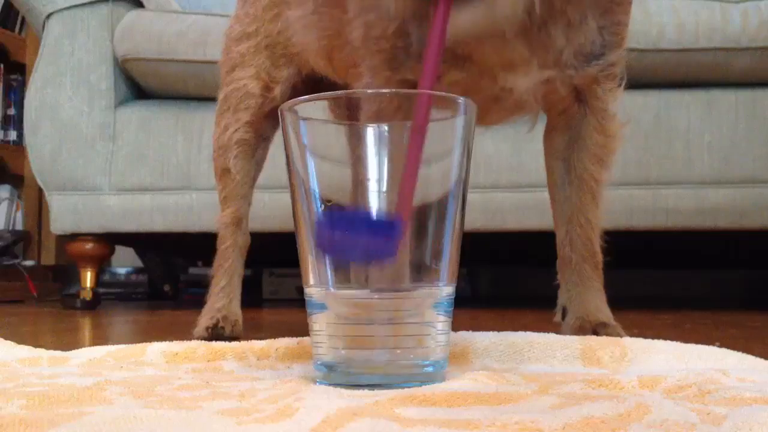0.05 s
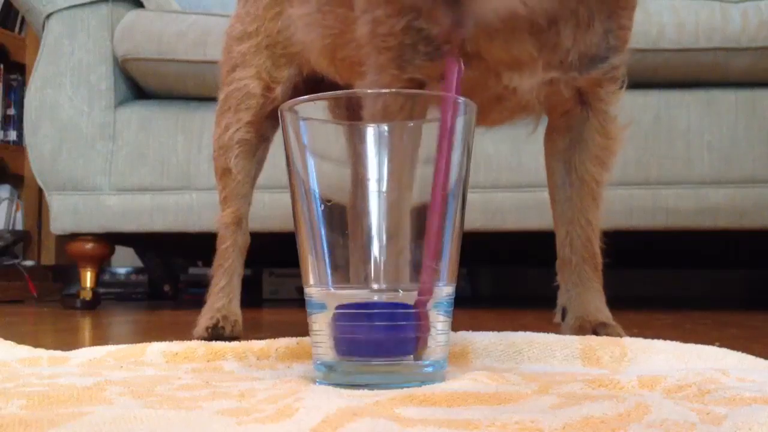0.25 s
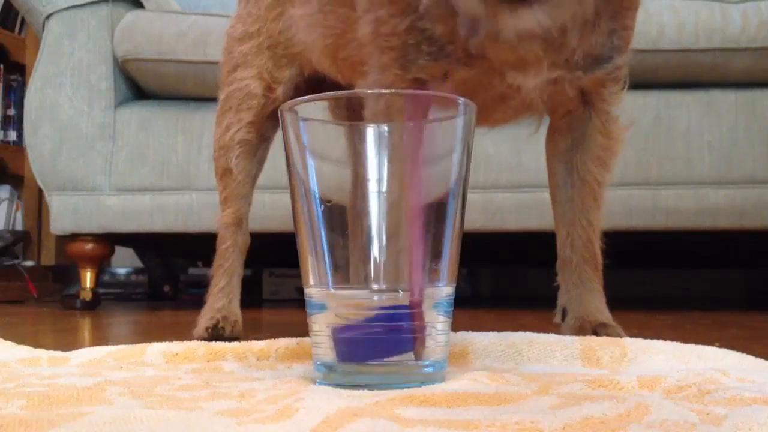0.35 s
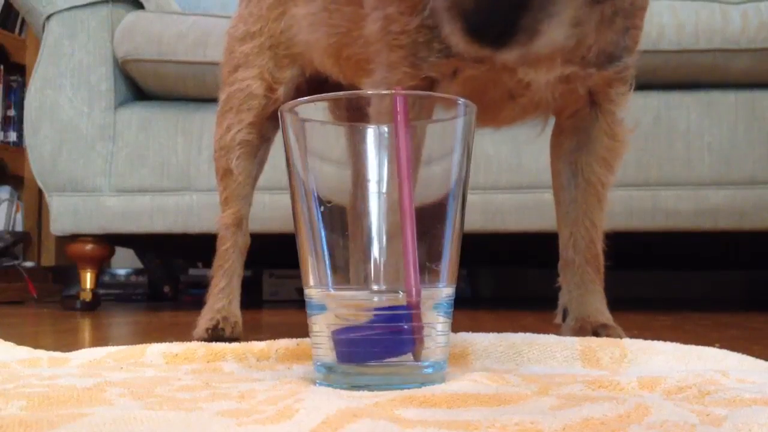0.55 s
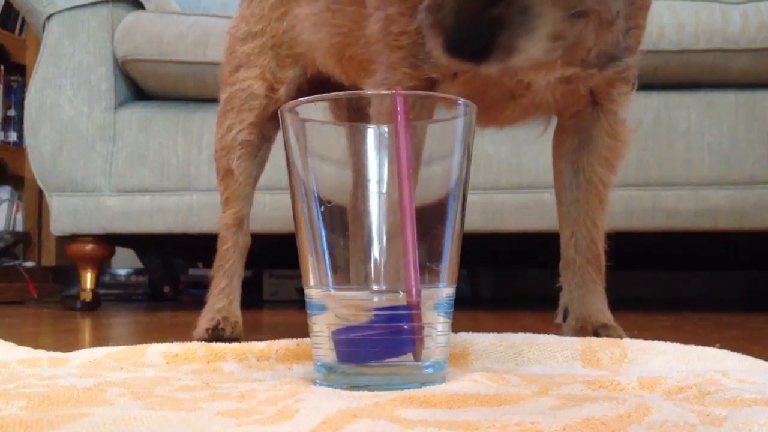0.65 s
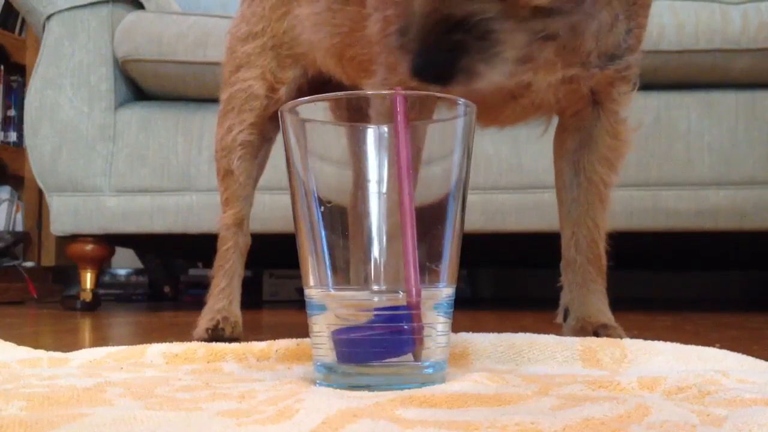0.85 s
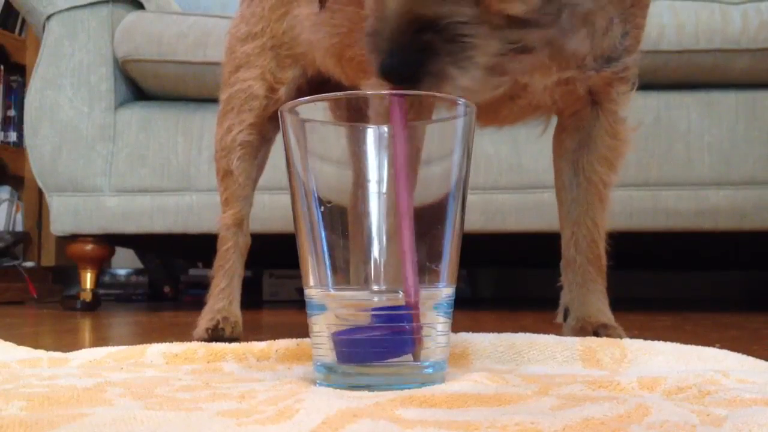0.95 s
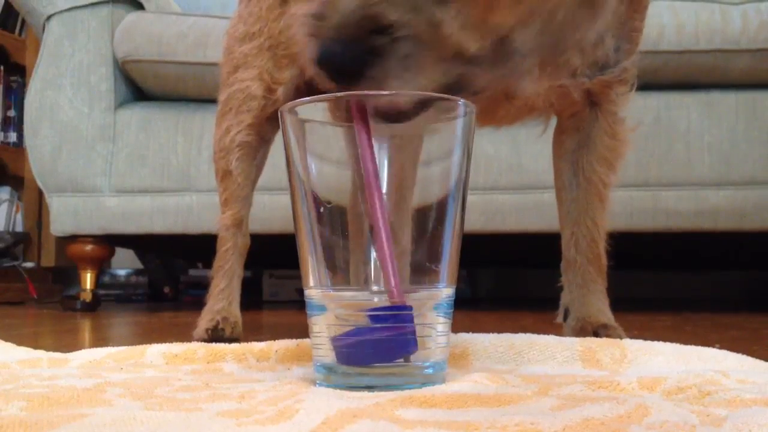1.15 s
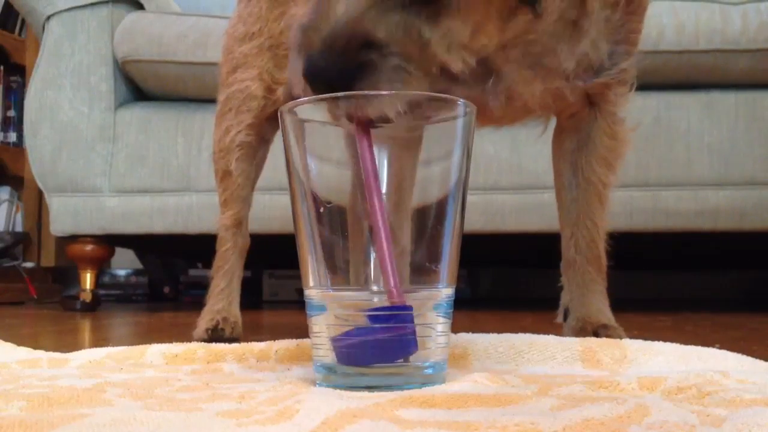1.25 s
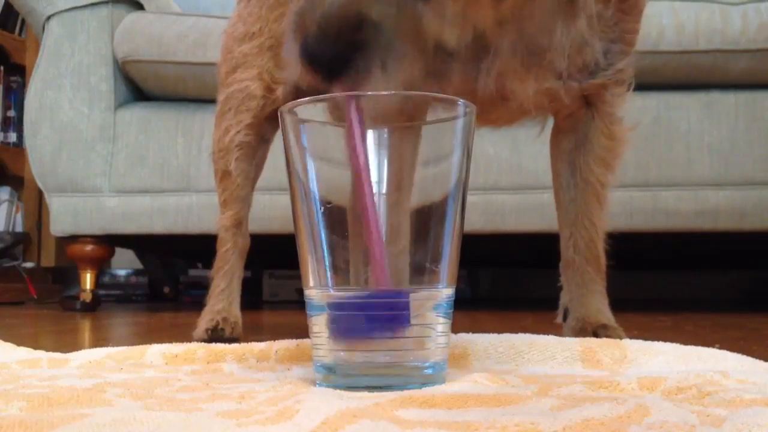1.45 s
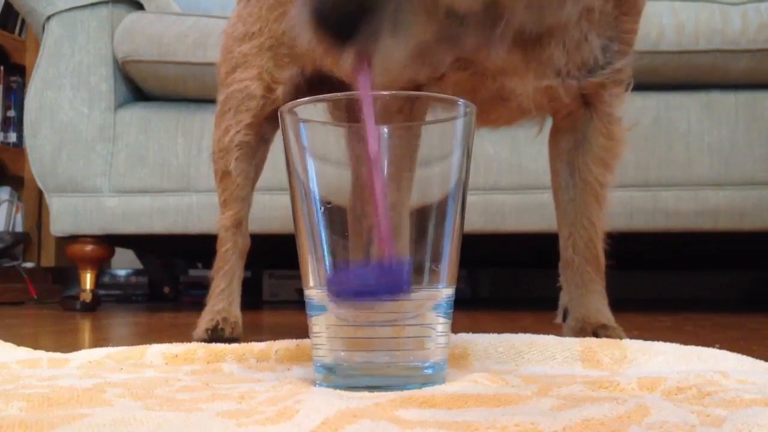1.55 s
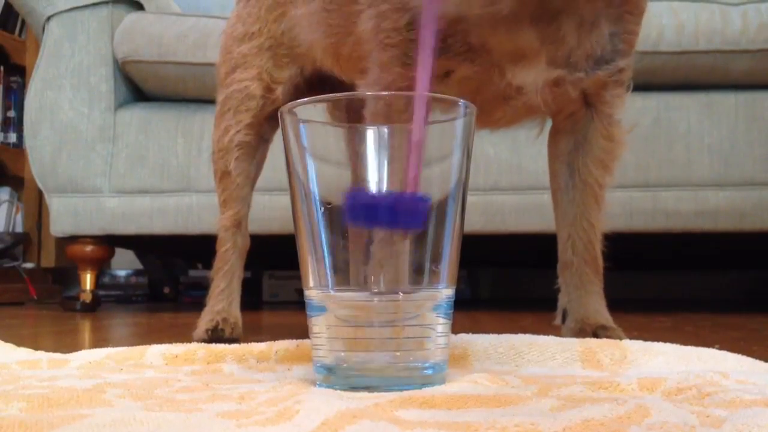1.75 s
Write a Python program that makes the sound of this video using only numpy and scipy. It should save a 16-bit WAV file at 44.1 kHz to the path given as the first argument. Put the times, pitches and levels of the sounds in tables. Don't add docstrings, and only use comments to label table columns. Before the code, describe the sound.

A drinking glass is struck by a plastic scoop, heard close up. Faint scraping opens, then two loud bright clinks at 0.2 and 0.3 seconds, with hollow knocks, rattling and a soft towel thump, settling by 0.5. The ringing dies quickly into quiet hiss. A softer clink comes at 1.1, then light plastic scrapes, ticks and small squeaks from 1.3 to 1.8 in a small furnished room.

```python
import sys
import numpy as np
from scipy import signal
from scipy.fft import rfft, irfft
from scipy.io import wavfile
from scipy.ndimage import uniform_filter1d

SR = 44100
rng = np.random.default_rng(int(sys.argv[2]) if len(sys.argv) > 2 else 0)


def unload_audio(sound):
    columns = np.transpose(np.atleast_2d(sound))
    steps = np.round(np.clip(columns, -1, 1) * 32767)
    wavfile.write(sys.argv[1], SR, steps.astype(np.int16))


def convert_level_to_amplitude(level_db):
    exponent = np.asarray(level_db, float) / 20
    return 10 ** exponent


N = 79380

WALL_HZ = [1965, 4105, 6789, 7349, 8982, 10168, 12460, 13580, 14105, 14770, 4568, 3975]


def seconds():
    return np.arange(N) / SR


def band(x, hz, width):
    return signal.lfilter(*signal.iirpeak(hz, hz / width, fs=SR), x)


def passband(x, low_hz, high_hz):
    return signal.sosfilt(signal.butter(3, [low_hz, high_hz], "band", fs=SR, output="sos"), x)


def unit(x):
    return x / np.sqrt(np.mean(x ** 2))


def resonate(x, hz, width):
    return band(band(x, hz, width), hz, width * SECOND_WIDTH[0])


def add(out, start, x):
    i = int(start * SR)
    out[i:i + len(x)] += x[:N - i]


def ring(start, hz, t60, clock, rise):
    out = np.zeros(N)
    first = int(start * SR)
    last = np.searchsorted(clock, clock[first] + 2 * t60)
    t = np.arange(first, last) / SR - start
    fade = convert_level_to_amplitude(-60 * (clock[first:last] - clock[first]) / t60)
    out[first:last] = np.clip(t / rise, 0, 1) * fade * np.sin(2 * np.pi * hz * t)
    return out


def burst(tau):
    click = 0.22 * np.exp(-np.arange(2048) / SR / tau) * rng.standard_normal(2048)
    click[0] = 2
    return click


def walk(rate):
    hold = int(SR / rate)
    steps = np.repeat(rng.standard_normal(N // hold + 1), hold)
    return unit(uniform_filter1d(steps, hold)[:N])


def grit():
    hits = rng.random(N) < 2500 / SR
    grains = hits * convert_level_to_amplitude(1.26 * rng.exponential(size=N)) * rng.standard_normal(N)
    return unit(grains) + 0.24 * rng.standard_normal(N)


SECOND_WIDTH = (2,)


def glass():
    # level/dB, t60/s, twin level/dB
    wall_tones = [(-11.5, 0.6, -30), (0, 0.23, -28.5), (-10, 0.15, -29), (-24, 0.24, -3.5),
                  (-20.5, 0.1, -9), (-23, 0.11, -8), (-29, 0.074, -17), (-37, .16, -13), (-21.5, .09, -15),
                  (-34, .1, -13.5), (-18.5, 0.02, -16.5), (-25.5, .06, -16.5)]
    twin_hz = [1976, 4111, 6797, 7316, 8956, 10148, 12475, 13600, 14125, 14745, 4690, 3921]
    # t/s, level/dB, lowest tone/dB, treble slope/dB per octave, twin level/dB
    knocks = [
        (.2011, -8.5, -10, -0.9, -8),
        (0.2672, -46.5, 8, 14.5, -1.5),
        (0.3152, -7.5, -1.5, 0.93, 2),
        (0.355, -38.5, -22, 13, -3.5),
        (1.1181, -24, 6.5, -2, -5),
    ]
    knock_spots = [0, 3, 1, 3, 2]
    # rim/dB, middle/dB, foot/dB, grazing touch/dB
    spots = [(0, 0.5, 1, 8), (-1, 0.5, -0.5, 0.5), (0, -1.5, 0.5, 6.5), (5, -11.5, 1.5, -7),
             (-4, 0.5, 0.5, 1.5), (-2, 0.5, -7.5, 0.5), (3.5, -2.5, 1.5, -8.5), (5, 1.5, -1, -4),
             (0.5, 1, -11, -8.5), (3, 1.5, -4, -12.5), (5, 4.5, -12, -3), (-0.5, -4.5, 2, -10)]
    # t/s, then factors for the lowest tone, the second (sinking fast near 0.6 s), the
    damping = np.array([(0, 4.4, 1.55, 1.8), (.27, 2.8, 0.98, 0.79), (.314, 1.4, 0.79, 1.3),
                        (.318, 0.65, 1.53, 1.49), (.35, 0.46, 0.9, 0.51), (.43, 0.69, 0.69, 0.91),
                        (0.521, 0.83, 0.82, 0.86), (0.559, 1.83, 2.5, 0.96), (.6, 1.07, 3, .95),
                        (.66, 0.83, 2.5, 1.04), (1.1, 1.48, 1.46, 0.95), (1.19, 0.6, 0.6, 0.9),
                        (1.22, 1.35, 0.49, 0.6), (1.36, 1.09, 1.54, 0.75), (1.4, 0.69, .9, .8),
                        (1.8, 0.7, .9, 0.85)]).T
    clocks = []
    for factor in damping[1:]:
        speed = np.clip(np.interp(seconds(), damping[0], factor), 0.2, 5)
        clocks.append(np.cumsum(speed) / SR)
    crack_db, crack_s, contact_s = -11.5, 0.0057, 0.00032
    out = np.zeros(N)
    for (start, db, low_db, slope, twin_db), spot in zip(knocks, knock_spots):
        add(out, start, convert_level_to_amplitude(db + crack_db) * passband(burst(crack_s), 1050, 6200))
        for k, (tone_db, t60, pair_db) in enumerate(wall_tones):
            tilt_db = low_db if k == 0 else slope * np.log2(WALL_HZ[k] / WALL_HZ[1])
            clock = clocks[min(k, 2)]
            main = ring(start, WALL_HZ[k], t60, clock, contact_s)
            twin = ring(start, twin_hz[k], t60, clock, contact_s)
            out += convert_level_to_amplitude(db + tone_db + spots[k][spot] + tilt_db) * (main + convert_level_to_amplitude(pair_db + twin_db) * twin)
    return out


def ticks():
    # t/s, level/dB, f/Hz, width/Hz
    taps = [(.001, -42, 2030, 1815), (.117, -44.5, 7400, 3500), (0.136, -46, 7900, 1980),
            (0.175, -54, 7930, 1960), (.222, -24.5, 2490, 1454), (0.24, -21.5, 2800, 1480),
            (.267, -17.5, 2600, 2500), (.268, -28.5, 5870, 250), (.269, -41, 9200, 700),
            (.203, -32.5, 1120, 450), (.214, -36, 1140, 400), (0.288, -27, 3180, 1510),
            (0.329, -35.5, 1240, 1190), (0.365, -24, 2920, 1524), (0.465, -34.5, 3420, 900),
            (.995, -43.5, 1500, 2200), (1.104, -49, 1500, 2000), (1.1143, -42, 2590, 900),
            (1.1173, -50, 5010, 3000), (1.284, -47.5, 6000, 5000), (1.299, -46.5, 3500, 1210),
            (1.298, -54, 6500, 4010), (1.118, -39.5, 8500, 2000), (1.423, -50, 2800, 1940),
            (1.383, -37, 5050, 5040), (1.4157, -39.5, 3400, 2500), (1.417, -44, 6840, 1210),
            (1.417, -49.5, 11600, 3990), (1.385, -53, 12000, 3500), (1.502, -31, 2600, 2190),
            (1.523, -30, 1880, 1670), (1.523, -39.5, 9000, 9000), (1.62, -43, 2950, 2010),
            (1.6396, -37.5, 1920, 900), (1.642, -38, 3350, 2020), (1.651, -35.5, 2584, 3020),
            (1.654, -49.5, 7600, 1500), (1.686, -41, 3300, 2430), (1.697, -51, 3200, 700),
            (1.708, -38, 3720, 1490), (1.731, -61, 4700, 1500)]
    fade_s, air_db = 0.0032, -37
    out = np.zeros(N)
    for start, db, hz, width in taps:
        click = burst(fade_s)
        body = passband(click, hz ** 2 / (hz + 0.82 * width), hz + 0.6 * width)
        add(out, start, convert_level_to_amplitude(db) * (body / np.abs(body).max() + convert_level_to_amplitude(air_db) * click))
    return out


def booms():
    # t/s, level/dB, f/Hz
    puffs = [(0.104, -48, 785), (0.116, -45, 785), (0.2, -33.5, 725), (0.221, -25.5, 805),
             (0.267, -15, 820.4), (0.289, -41, 830), (0.326, -27, 845), (0.369, -46.5, 752),
             (0.457, -41.5, 810), (0.497, -44, 857), (0.994, -52, 704), (1.117, -40, 776),
             (1.178, -46, 810), (1.298, -46.5, 782), (1.346, -48, 805), (1.376, -45.5, 710),
             (1.502, -49.5, 795), (1.522, -54, 831), (1.549, -47.5, 805), (1.655, -39.5, 805),
             (1.7, -48, 760), (1.777, -53, 790)]
    # f/Hz, level/dB, t60/s
    air_tones = [(805, -4.5, 0.063), (845, -23, 0.076), (740, -33, 0.058)]
    rise_s = 0.0025
    out = np.zeros(N)
    for start, db, pitch_hz in puffs:
        shift = pitch_hz / air_tones[0][0]
        for hz, tone_db, t60 in air_tones:
            out += convert_level_to_amplitude(db + tone_db) * ring(start, hz * shift, t60, seconds(), rise_s)
    return out


def chatter():
    # t/s, level/dB
    settling = [
        (.2, -90.5),
        (.202, -39),
        (.25, -47.5),
        (.3, -45.5),
        (.33, -42.5),
        (.37, -46.5),
        (.4, -56),
        (.48, -58.5),
        (.58, -82),
    ]
    level_db = np.interp(seconds(), *np.array(settling).T, right=-120)
    rub = grit() * convert_level_to_amplitude(level_db + 1.5 * walk(80))
    shiver_db, top_db, air_db, width = -1.5, -8, 9, 180
    shiver = np.zeros(N)
    for hz in [*WALL_HZ[2:10], 5900]:
        tone_db = top_db if hz > 11000 else 0
        shiver += convert_level_to_amplitude(tone_db) * band(band(rub, hz, width), hz, 3 * width)
    shiver *= np.sqrt(SR / width / 30)
    return 2.02 * passband(rub, 900, 4700) + convert_level_to_amplitude(shiver_db) * shiver + convert_level_to_amplitude(air_db) * band(rub, 820, 80)


def scrape():
    # t/s, level/dB, brightness/dB per octave
    strokes = np.array([(0, -47.5, -1), (0.052, -63, -2.5), (.15, -68.5, -4), (0.198, -77.5, -5.5),
                        (.9, -88.5, -4), (.99, -88.5, 4), (1.001, -69, -3.5), (1.1, -84, 0),
                        (1.25, -76.5, -6.5), (1.37, -64.5, 1.5), (1.39, -60, -1.5), (1.45, -61.5, 4),
                        (1.49, -63, 7), (1.529, -53, -6), (1.6, -58, -1), (1.66, -54.5, 1),
                        (1.718, -59, -1), (1.8, -65, 6)]).T
    # f/Hz, width/Hz, level/dB
    resonances = [(810, 63, -11.5), (1350, 670, -12.5), (1840, 320, -2.5), (2800, 510, -1.5),
                  (3500, 310, -9), (4770, 2300, -10), (7455, 530, -7)]
    rub = grit()
    push_db = np.interp(seconds(), strokes[0], strokes[1])
    slope = np.interp(seconds(), strokes[0], strokes[2])
    flicker_db, bed_db = 4.5, -8
    out = convert_level_to_amplitude(bed_db) * unit(passband(rub, 750, 8800))
    for hz, width, db in resonances:
        level_db = db - 8 + slope * np.log2(hz / 2500) + flicker_db * walk(18)
        out += convert_level_to_amplitude(level_db) * unit(resonate(rub, hz, width))
    return out * convert_level_to_amplitude(push_db)


def rubs():
    # t/s, half length/s, level/dB, f/Hz, width/Hz
    squeaks = [(.005, 0.018, -59.5, 7800, 150), (1.06, 0.025, -66, 1250, 230),
               (1.298, 0.0064, -65, 1440, 398), (1.392, 0.0067, -53.5, 3440, 350),
               (1.5, 0.013, -64, 6800, 180), (1.541, 0.023, -55, 2470, 360), (1.72, 0.026, -58, 785, 49),
               (1.57, 0.021, -59.5, 813, 70), (1.628, 0.016, -65, 760, 92), (.4, .05, -57.5, 840, 31),
               (0.63, 0.021, -67, 4150, 21), (0.018, .03, -60, 1500, 660), (.05, 0.054, -65, 3000, 400),
               (1.545, 0.029, -58, 1800, 400), (1.667, 0.044, -59, 1830, 350),
               (1.45, .03, -64.5, 3120, 750), (1.62, 0.063, -63, 4640, 630),
               (1.70, 0.031, -59.5, 3340, 330), (1.744, 0.025, -58.5, 4760, 490),
               (1.789, 0.025, -59.5, 3470, 536)]
    t, rub, out = seconds(), grit(), np.zeros(N)
    for middle, half_s, db, hz, width in squeaks:
        swell = np.exp(-0.5 * ((t - middle) / half_s) ** 2)
        out += convert_level_to_amplitude(db) * swell * unit(resonate(rub, hz, width))
    return out


def thumps():
    # t/s, level/dB, f/Hz, half length/s
    pushes = [
        (.324, -44, 264, 0.0021),
        (.332, -33, 188, 0.0042),
        (.333, -46.5, 428, 0.0041),
        (0.348, -48.5, 215.6, 0.0048),
        (0.503, -45.5, 202, 0.0034),
        (1.108, -48, 248, 0.0018),
        (1.129, -54.5, 163.4, 0.0045),
    ]
    t, out = seconds(), np.zeros(N)
    for middle, db, hz, half_s in pushes:
        swell = np.exp(-0.5 * ((t - middle) / half_s) ** 2)
        out += convert_level_to_amplitude(db) * swell * np.sin(2 * np.pi * hz * (t - middle))
    return out


def room_echo(x):
    t60_s, lag_s, top_hz, echo_db = 0.46, 0.0032, 6180, -8.5
    t = np.arange(SR // 2) / SR
    tail = rng.standard_normal(len(t)) * (t > lag_s) * np.exp(-np.log(1000) * t / t60_s)
    tail = unit(tail) / np.sqrt(len(t))
    tail = signal.lfilter(*signal.butter(1, top_hz, fs=SR), tail)
    return convert_level_to_amplitude(echo_db) * signal.fftconvolve(x, tail)[:N]


def floor():
    # f/Hz, level/dB
    hz, db = np.array([(18, -57.5), (30, -30), (194, -1.5), (962, -12.5), (1350, -13), (1900, -18.5),
                       (2060, -15), (14400, -23.5), (16000, -36)]).T
    f = np.maximum(np.arange(N // 2 + 1) * SR / N, 1)
    colour = convert_level_to_amplitude(np.interp(np.log(f), np.log(hz), db))
    hiss = irfft(rfft(rng.standard_normal(N)) * colour, N)
    return unit(hiss) * convert_level_to_amplitude(-64 + 0.32 * walk(9.6))


def scene():
    low_hz, top_hz = 452.6, 14900
    wall = passband(glass(), low_hz, top_hz)
    scoop = passband(ticks() + booms() + chatter() + scrape(), low_hz, top_hz) + rubs()
    base = thumps()
    echo = room_echo(0.25 * wall + scoop + 0.25 * base)
    return (wall + scoop + base + echo + floor())[None]


def mask(x):
    band_step, reach = 1.055, 5
    mask_db, rise_db_per_octave, masked_db = -32.5, 3, -19
    f, _, z = signal.stft(x, SR, nperseg=2048, noverlap=1024)
    which = np.floor(np.log(np.maximum(f, 1000) / 1000) / np.log(band_step)).astype(int)
    power = np.array([np.sum(np.abs(z[which == b]) ** 2, axis=0) for b in range(which.max() + 1)])
    keep = np.ones_like(power)
    for b in range(reach + 1, len(power)):
        octaves = b * np.log2(band_step) - 2.5
        limit = convert_level_to_amplitude(2 * (mask_db + rise_db_per_octave * octaves))
        faint = power[b] < limit * power[b - reach:b].max(axis=0)
        keep[b, faint] = convert_level_to_amplitude(masked_db)
    return signal.istft(z * keep[which], SR, nperseg=2048, noverlap=1024)[1][:N]


def low_pass(x):
    return signal.sosfilt(signal.butter(12, 16140, fs=SR, output="sos"), x)


def record(dry):
    sound = mask(dry[0])[None]
    sound = signal.sosfilt(signal.butter(1, 60, "high", fs=SR, output="sos"), sound)
    sound = signal.sosfilt(signal.cheby1(8, 0.5, 15300, fs=SR, output="sos"), sound)
    return low_pass(sound)


dry = scene()
out = record(dry)
unload_audio(out)
```